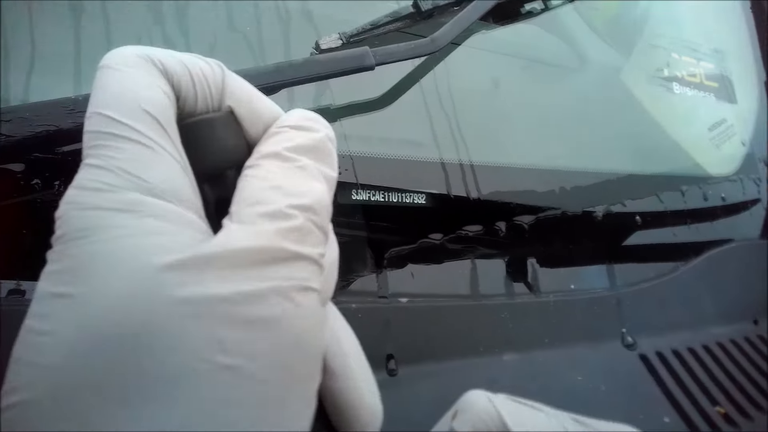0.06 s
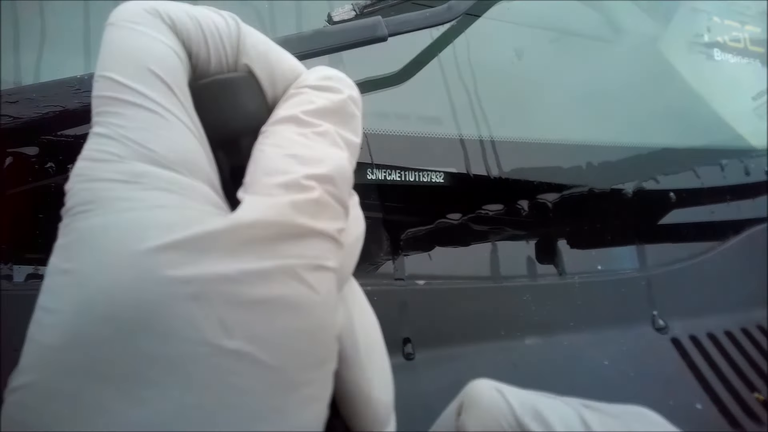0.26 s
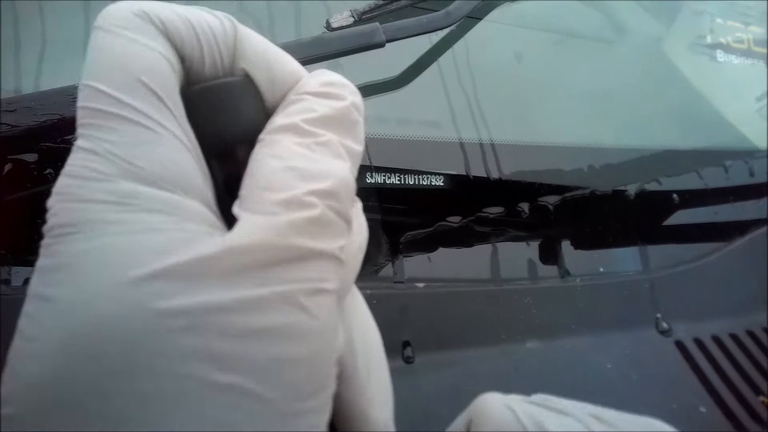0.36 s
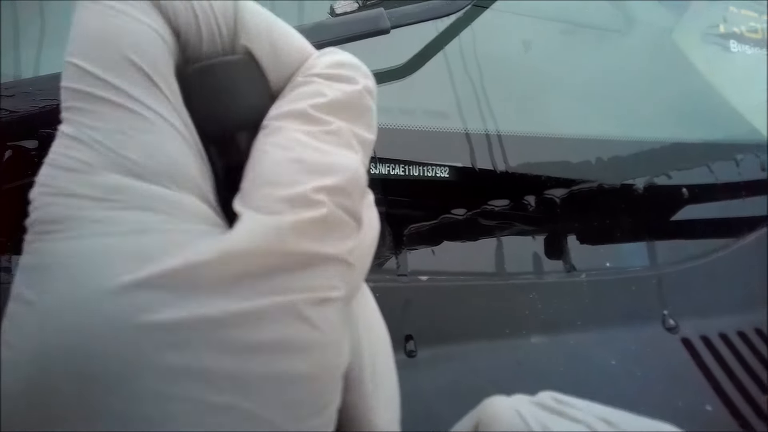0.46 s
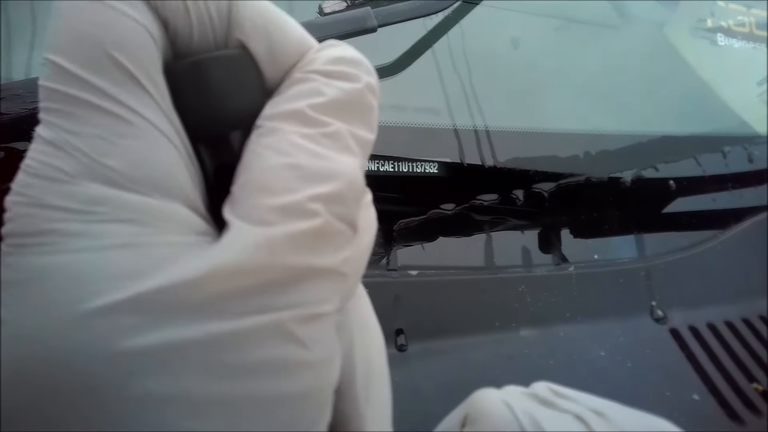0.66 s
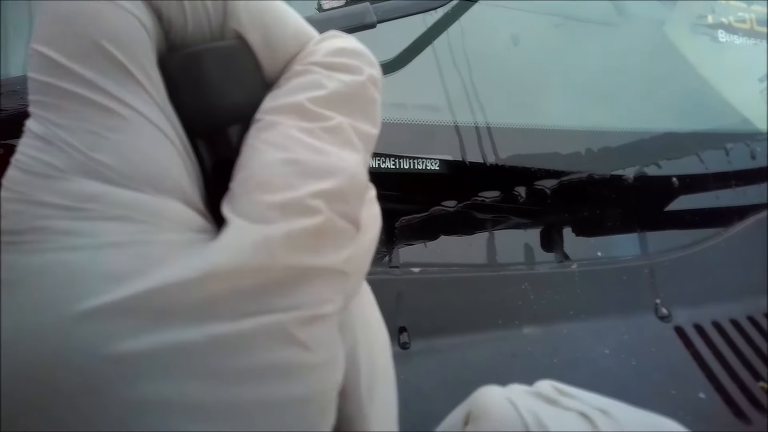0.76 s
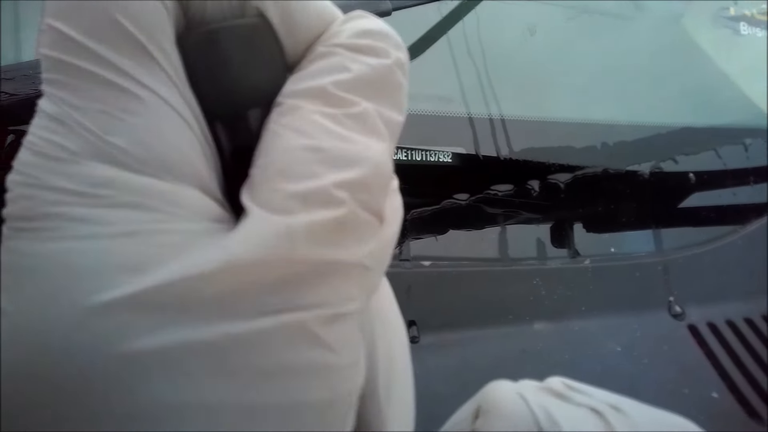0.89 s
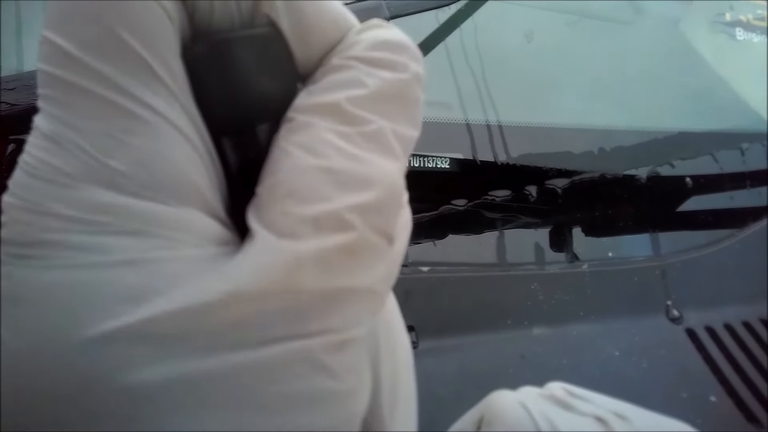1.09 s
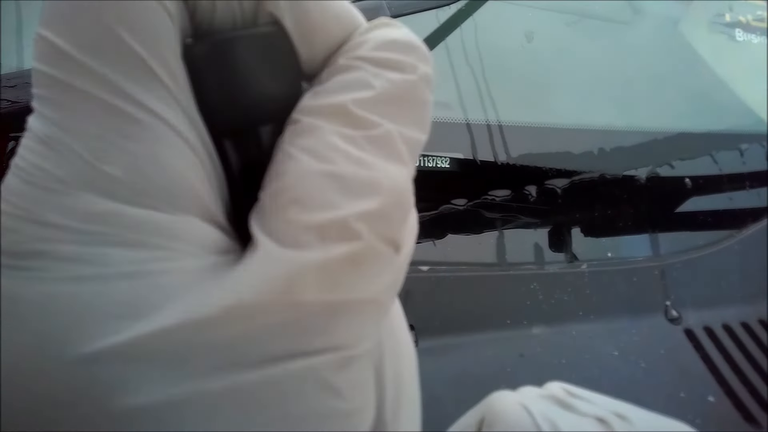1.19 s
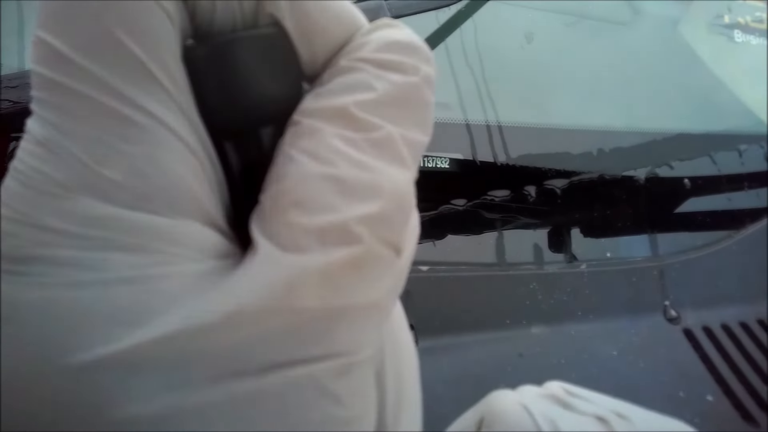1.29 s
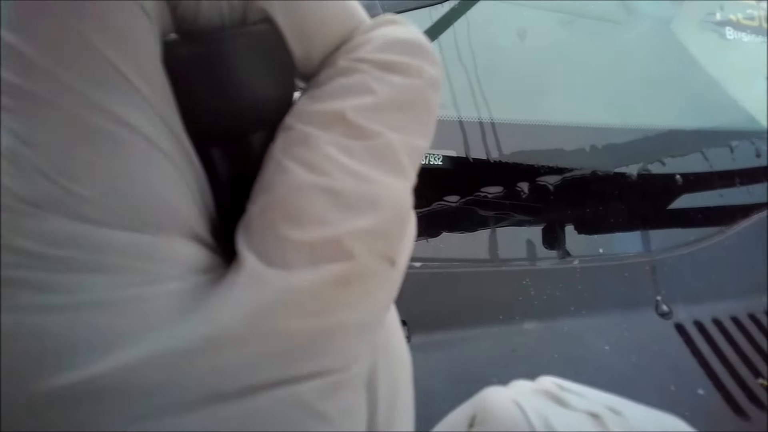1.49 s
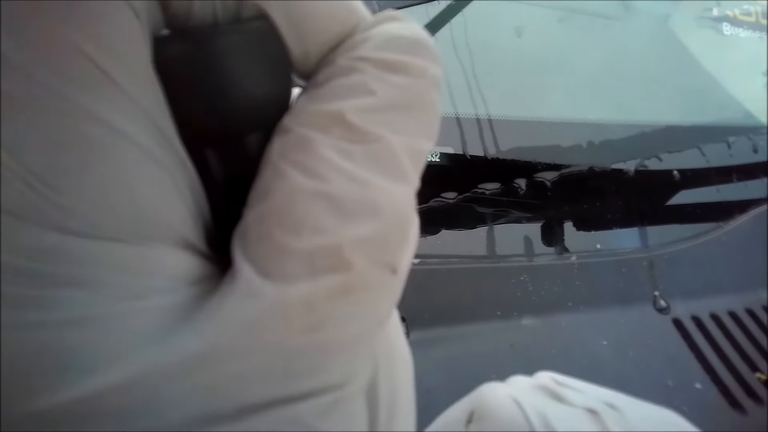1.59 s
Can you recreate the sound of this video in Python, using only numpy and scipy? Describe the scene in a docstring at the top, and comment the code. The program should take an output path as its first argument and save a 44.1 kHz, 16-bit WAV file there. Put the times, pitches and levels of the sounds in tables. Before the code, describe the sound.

Close to the microphone, gloved hands snap a small plastic piece into place, thumping the car panel beneath, then click it twice and bump it softly. Far birds whistle faintly over a low engine hum and open air.

```python
"""Outdoors, a faint engine hum and the hiss of open air run throughout, and a far bird flutes from the start.
Close by, gloved hands work a small plastic part on a car. At 0.23 s it snaps home with a double crack,
and the panel under it thumps hollowly. A second far bird joins with a thin, falling song.
From 0.53 s the hands bump softly now and then; the part clicks at 0.56 s and 0.77 s.
The birds sing on to about 1.5 s, echoing off walls and trees."""
import sys
import numpy as np
from scipy import signal
from scipy.fft import rfft, irfft
from scipy.io import wavfile
from scipy.ndimage import uniform_filter1d

SR = 44100
rng = np.random.default_rng(int(sys.argv[2]) if len(sys.argv) > 2 else 0)


def dump_mix(stems):
    """Bounce the given channels to the path in sys.argv[1] as a 16-bit WAV at rate SR."""
    frames = np.atleast_2d(stems).T  # one column per channel
    limited = np.clip(frames, -1, 1)  # hard clip at full scale
    pcm = np.round(limited * 32767).astype(np.int16)
    wavfile.write(sys.argv[1], SR, pcm)


N = 72765
TIME_S, BIN_HZ = np.arange(N) / SR, np.fft.rfftfreq(N, 1 / SR)


def amp(db):
    """Decibels to gain."""
    return 10 ** (np.asarray(db) / 20)


def unit(x):
    """Scales to rms 1."""
    return x / np.sqrt(np.mean(x ** 2) + 1e-20)


def curve(points):
    """Interpolates (Hz, value) rows over the FFT bins on a log-frequency axis."""
    hz, value = np.transpose(points)
    return np.interp(np.log(BIN_HZ + 1), np.log(hz + 1), value)


def add(mix, start_s, sound):
    """Mixes a sound in at start_s."""
    span = mix[round(start_s * SR):][:len(sound)]
    span += sound[:len(span)]


def drift(rate_hz):
    """Smooth random motion of rms 1."""
    lowpass = np.exp(-(BIN_HZ / rate_hz) ** 2)
    return unit(irfft(rfft(rng.standard_normal(N)) * lowpass, N))


def noise(spectrum, tilt_db_per_oct=0):
    """Noise of rms 1 with a given spectral shape."""
    gain = amp(curve(spectrum) + tilt_db_per_oct * np.log2(BIN_HZ + 1))
    return unit(irfft(gain * np.exp(2j * np.pi * rng.random(len(BIN_HZ))), N))


def decay(t60_s):
    """Envelope that falls 60 dB in t60_s."""
    return np.exp(-np.log(1000) * TIME_S / t60_s)


def band_decay(x, ring, t60_scale=1):
    """Lets each band of a sound decay with its own t60."""
    centres_hz, t60s = np.transpose(ring)
    bands = [irfft(rfft(x) * curve(np.c_[centres_hz, share]), N) for share in np.eye(len(ring))]
    return sum(band * decay(t60_s * t60_scale) for band, t60_s in zip(bands, t60s))


# Each row: frequency in Hz, level in dB.
ENGINE_ORDERS = [(78, -60), (156.5, -61), (237, -62), (313, -69), (414, -69)]

def engine_hum(drift_hz=7.1):
    """A distant engine's low orders waver together in pitch and swell separately."""
    clock_s = np.cumsum(1 + 0.01225 * drift(drift_hz)) / SR
    out = np.zeros(N)
    for hz, level_db in ENGINE_ORDERS:
        swell = 1 + 0.5 * drift(drift_hz)
        out += amp(level_db) * unit(swell * np.sin(2 * np.pi * (hz * clock_s + rng.random())))
    return out


# Each row: frequency in Hz, relative density in dB.
AIR_SPECTRUM = [(15, -23), (33, 3), (75, -1.5), (104, -5.5), (170, -6), (260, -7.5), (420, -11.5),
                (720, -12), (1100, -18), (1800, -20), (4140, -28.5), (8000, -35.5), (15800, -39)]

def open_air(level_db=-51.5, fade_db_per_s=-2.5, patch_db=0.43):
    """Rumble and hiss with faint drifting patches, slowly easing."""
    cells = signal.stft(noise(AIR_SPECTRUM), nperseg=512)[2]
    patches = uniform_filter1d(rng.standard_normal(cells.shape), size=8, axis=0)
    patches = unit(uniform_filter1d(patches, size=12, axis=1))
    wash = signal.istft(cells * amp(patch_db * patches), nperseg=512)[1][:N]
    return wash * amp(level_db + fade_db_per_s * (TIME_S - N / SR / 2))


# Each row: frequency in Hz, relative density in dB.
HISS_SPECTRUM = [(1000, -14.5), (8000, -1.5), (14000, -1), (16000, -12.5)]

def microphone_hiss(level_db=-65):
    """The microphone's steady self-noise."""
    return amp(level_db) * noise(HISS_SPECTRUM)


# Each row: start in seconds, length in seconds, start pitch in Hz, end pitch in Hz,
# relative level in dB, waver as a fraction of pitch.
LARGE_BIRD_FLUTING = [(.005, .12, 2038, 2015, -63.5, 0.015), (.125, 0.11, 1770, 1817, -57.5, 0.024),
                      (.23, 0.15, 2010, 1992, -58, 0.034), (.29, 0.1003, 2790, 2636, -55, 0.0452),
                      (.36, 0.061, 2500, 2265, -65, 0.025), (.715, 0.056, 2100, 2380, -57, 0.072),
                      (.785, 0.12, 3367, 2760, -57, 0.0274), (.87, 0.21, 1910, 2027, -63.5, 0.012),
                      (.915, 0.082, 2760, 2660, -52, 0.0088), (1.025, 0.024, 2850, 3240, -49, 0.018),
                      (1.04, 0.058, 3190, 3239, -51, 0.0045), (1.135, 0.073, 3240, 2938, -54, 0.012),
                      (1.16, 0.17, 2757, 2830, -64, .022)]
SMALL_BIRD_THIN_SONG = [(.275, 0.074, 6930, 6010, -57, 0.01), (.41, .075, 6570, 5830, -58, 0.016),
                        (.52, .115, 5130, 5180, -58, 0.014), (.655, 0.067, 5090, 5190, -57.5, 0.023),
                        (.745, 0.053, 5040, 5050, -56.5, .018), (.82, 0.07, 4910, 5000, -63.5, 0.02),
                        (.92, 0.045, 4820, 4890, -57, .016), (1.01, 0.045, 4860, 4890, -56.5, 0.013),
                        (1.08, 0.056, 4770, 4910, -58.5, 0.019), (1.19, 0.052, 4780, 4810, -61.5, 0.012),
                        (1.27, 0.048, 4780, 4790, -62, 0.015), (1.36, 0.144, 4720, 4790, -68.5, 0.02)]

def bird(notes, edge_s=0.011, waver_hz=135):
    """Gliding whistles, some pure, some burry from a fast waver."""
    out = np.zeros(N)
    for start_s, length_s, from_hz, to_hz, level_db, waver in notes:
        t = np.arange(0, length_s, 1 / SR)
        glide_hz = from_hz + (to_hz - from_hz) * t / length_s
        hz = glide_hz * (1 + waver * drift(waver_hz)[:len(t)])
        whistle = unit(np.sin(2 * np.pi * np.cumsum(hz) / SR))
        ramp = np.clip(np.minimum(t, length_s - t) / edge_s, 0, 1)
        add(out, start_s, amp(level_db) * np.sin(np.pi / 2 * ramp) ** 2 * whistle)
    return out


# Each row: frequency in Hz, t60 in seconds.
ECHO_DECAY = [(200, 0.3), (2500, 0.96), (5000, 0.77), (7000, 0.46)]

def outdoor_echoes(x, taps_per_s=2000, predelay_s=0.012):
    """Scattered echoes from walls and trees; the midrange lasts longest."""
    taps = rng.standard_normal(N) * (rng.random(N) < taps_per_s / SR) * (TIME_S > predelay_s)
    tail = band_decay(taps, ECHO_DECAY)
    return signal.fftconvolve(x, tail / np.linalg.norm(tail))[:N]


# Each row: start in seconds, level in dB, tilt in dB per octave, t60 scale.
SNAP_CONTACTS = [(0.226, -26, -0.9, .9), (0.2307, -27, 0.5, 1.0)]
CLICK_CONTACTS = [(0.56, -40.5, 0, 1.28), (0.7657, -33.5, -0.3, 1.05)]
# Each row: frequency in Hz, relative density in dB.
SNAP_SPECTRUM = [(200, -6.5), (600, -2.5), (880, 2), (1200, -3), (1750, -2), (2120, -3), (2300, -15),
                 (3300, -9), (5100, -9.5), (6200, -16.5), (7600, -12.5), (10000, -9), (11500, -19.5),
                 (14000, -17), (16000, -43)]
CLICK_SPECTRUM = [(200, -14), (900, -8), (1400, -3.5), (2100, 0), (3000, -2.5), (5400, -2.5), (5800, -5.5),
                  (7500, -11), (8700, -3), (10800, -5.5), (11700, -13), (14200, -6), (16000, -34)]
# Each row: frequency in Hz, unscaled t60 in seconds.
SNAP_DECAY = [(300, 0.29), (1000, 0.098), (2500, 0.12), (6000, 0.061), (14000, 0.03)]
CLICK_DECAY = [(1000, 0.094), (4000, 0.044), (9000, 0.047), (15000, 0.033)]
# Each row: frequency in Hz, level in dB relative to the contact, unscaled t60 in seconds.
PLASTIC_MODES = [(2116, -13.5, .055), (4790, -17, 0.075), (5450, -32, 0.08), (7240, -18.5, 0.078),
                 (7420, -20.5, 0.055), (9600, -28, 0.043)]

def plastic_part(contacts, spectrum, ring, edge_db=-12.5, edge_s=0.0012):
    """Hard contacts: a sharp edge, then crowded plastic modes, a few of which ring clearly."""
    edge = 1 + amp(edge_db) * np.exp(-TIME_S / edge_s)
    out = np.zeros(N)
    for start_s, level_db, tilt_db_per_oct, t60_scale in contacts:
        modes = band_decay(noise(spectrum, tilt_db_per_oct), ring, t60_scale)
        for hz, mode_db, t60_s in PLASTIC_MODES:
            tone = np.sin(2 * np.pi * (hz * TIME_S + rng.random()))
            modes += amp(mode_db) * decay(t60_s * t60_scale) * tone
        add(out, start_s, amp(level_db) * modes * edge)
    return out


def thuds(events, spectrum, rise_s, t60_s):
    """Dull blows with a soft start and no clear pitch."""
    envelope = (1 - np.exp(-TIME_S / rise_s)) * decay(t60_s)
    out = np.zeros(N)
    for start_s, level_db in events:
        add(out, start_s, amp(level_db) * noise(spectrum) * envelope)
    return out


# Each row: frequency in Hz, level in dB, t60 in seconds, rise in seconds.
PANEL_MODES = [(103, -32.5, 0.28, 0.0027), (123, -15.5, 0.093, 0.0052), (155.5, -14.5, 0.22, 0.023),
               (240.5, -19, 0.23, 0.014), (336, -26, 0.18, 0.017), (454.6, -23, 0.14, 0.017),
               (536, -27.5, 0.15, 0.01), (668, -31, 0.17, 0.019), (812, -17.5, 0.047, 0.0026),
               (904.4, -30.5, 0.14, 0.0042), (1016, -26.5, 0.063, 0.0052), (1330, -31.5, 0.068, 0.008),
               (1727, -22.5, .06, 0.0043)]
# Each row: start in seconds, level in dB.
PANEL_KNOCKS = [(0.2266, -30), (0.243, -42), (0.270, -34.5), (0.308, -38.5)]
# Each row: frequency in Hz, relative density in dB.
KNOCK_SPECTRUM = [(25, -18), (60, -9), (120, -7), (195, -8), (270, -6), (400, -12), (800, -16.5),
                  (1200, -27), (3000, -48)]

def panel_thump(start_s=0.2275):
    """The panel's modes build up and ring out; it knocks dully as it takes the blow and settles."""
    out = np.zeros(N)
    for k, (hz, level_db, t60_s, rise_s) in enumerate(PANEL_MODES):
        swing = (-1) ** k * np.sin(2 * np.pi * hz * TIME_S)  # neighbours start in antiphase
        build_up = 1 - np.exp(-(TIME_S / rise_s) ** 2)
        add(out, start_s, amp(level_db) * build_up * decay(t60_s) * swing)
    return out + thuds(PANEL_KNOCKS, KNOCK_SPECTRUM, rise_s=0.0037, t60_s=0.18)


# Each row: start in seconds, level in dB.
HAND_BUMPS = [(.528, -38), (.588, -43), (.955, -46.5), (1.42, -53.5)]
# Each row: frequency in Hz, relative density in dB.
BUMP_SPECTRUM = [(15, -27), (38, -3), (72, 5), (120, -17), (300, -25), (1000, -60)]

def hand_bumps():
    """Gloved hands make soft, deep thuds as they work."""
    return thuds(HAND_BUMPS, BUMP_SPECTRUM, rise_s=0.007, t60_s=0.24)


def scene():
    """Mono mix; the far birds carry much more echo than the near part and panel."""
    background = engine_hum() + open_air() + microphone_hiss()
    birds = bird(LARGE_BIRD_FLUTING) + bird(SMALL_BIRD_THIN_SONG)
    snap = plastic_part(SNAP_CONTACTS, SNAP_SPECTRUM, SNAP_DECAY) + panel_thump()
    clicks = plastic_part(CLICK_CONTACTS, CLICK_SPECTRUM, CLICK_DECAY)
    near = snap + clicks
    echoes = outdoor_echoes(amp(-21) * near + amp(-7.5) * birds)
    return (background + amp(-4) * birds + near + echoes + hand_bumps())[None]


def record(dry):
    """Low-pass at 15.9 kHz."""
    lowpass = signal.firwin(255, 15900, window=("kaiser", 9), fs=SR)
    return signal.oaconvolve(dry, lowpass[None], "same")


dry = scene()
out = record(dry)
dump_mix(out)
```